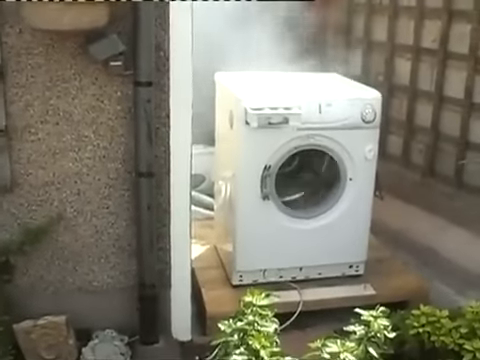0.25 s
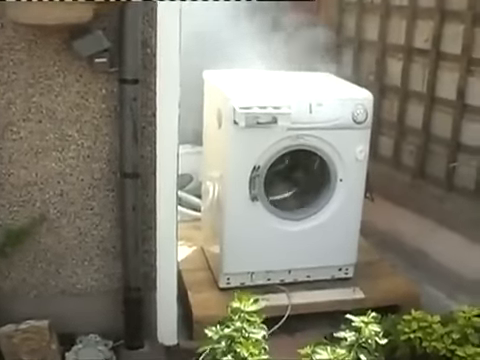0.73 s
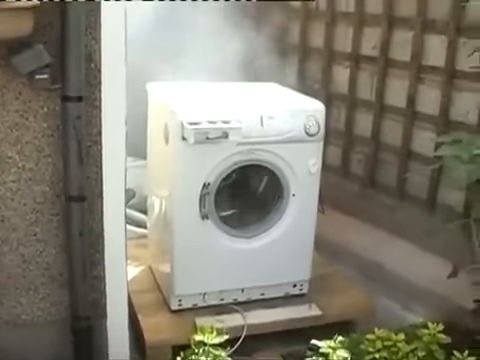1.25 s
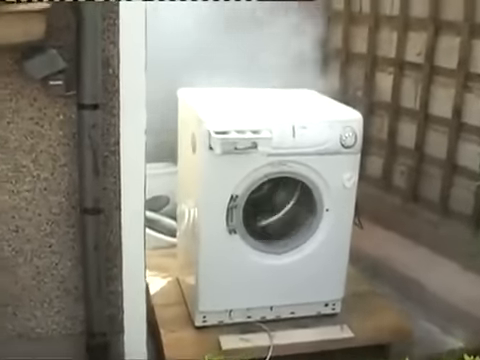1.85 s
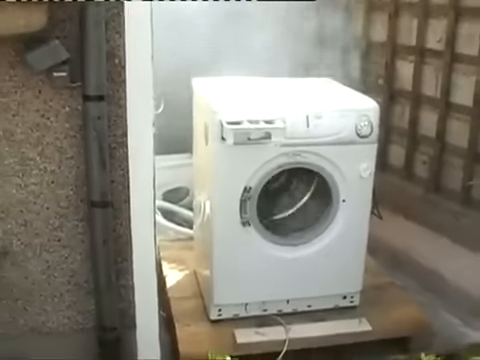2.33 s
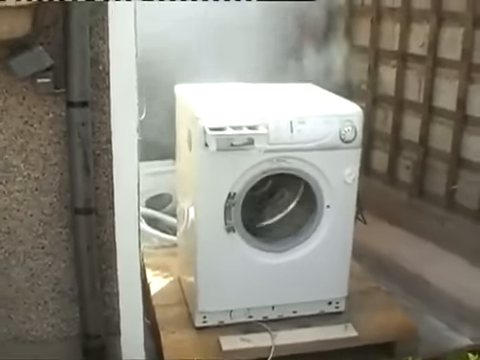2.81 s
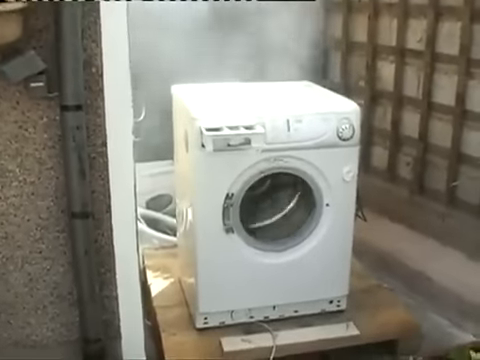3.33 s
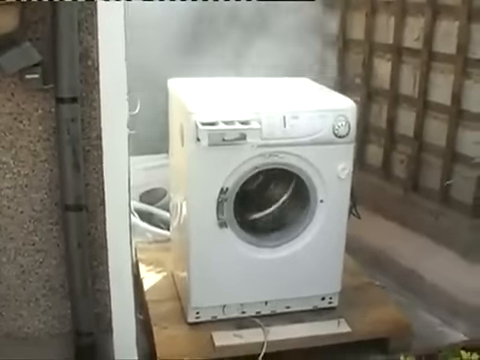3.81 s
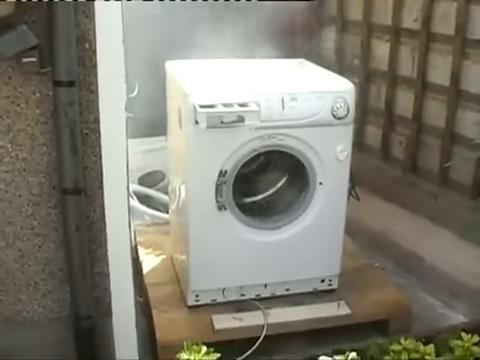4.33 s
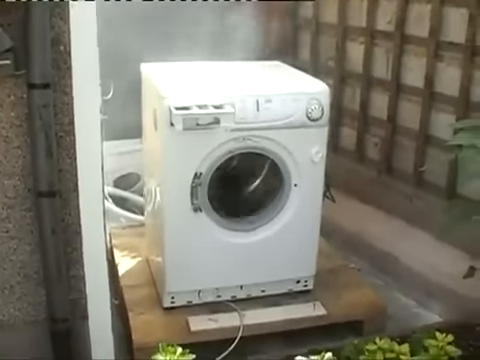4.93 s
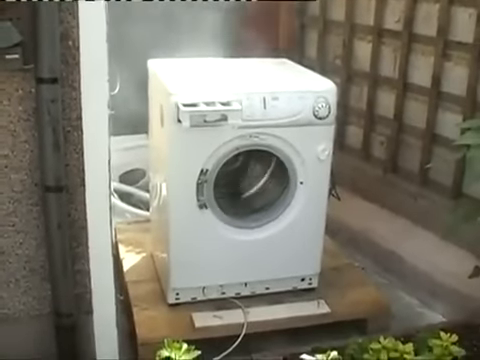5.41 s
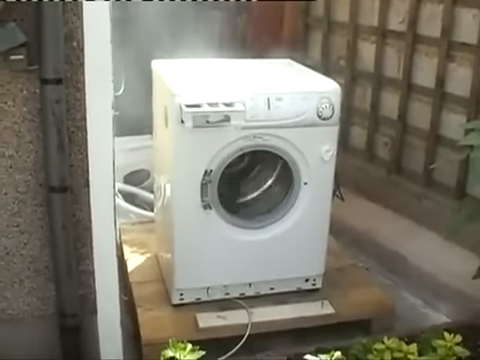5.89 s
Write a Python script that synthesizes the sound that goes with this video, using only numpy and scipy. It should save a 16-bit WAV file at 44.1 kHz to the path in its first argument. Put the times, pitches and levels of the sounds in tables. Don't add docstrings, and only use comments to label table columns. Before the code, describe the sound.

A continuous, violent machine-gun clatter: a rock strikes the same spots in a spinning washer drum on every turn, so the pattern nearly repeats. Blunt thuds shake the casing, the drum shell rings and hums, and bare steel rasps brightly. Close by in a hard-walled yard, the small microphone clips and sags under each burst, with short scattered reflections on both sides and no other sounds.

```python
import sys
import numpy as np
from scipy import signal
from scipy.fft import rfft, irfft, next_fast_len
from scipy.io import wavfile
from scipy.ndimage import map_coordinates

SR = 44100
rng = np.random.default_rng(int(sys.argv[2]) if len(sys.argv) > 2 else 0)


def materialize(psi):
    bounded = np.clip(np.atleast_2d(psi).T, -1, 1)
    quanta = np.round(bounded * 32767).astype(np.int16)
    wavfile.write(sys.argv[1], SR, quanta)


def attenuation_scalar(level_db):
    decades = np.asarray(level_db, float) / 20
    return 10 ** decades


N = 271215

# (time into the turn [s], strength [dB], hardness [-1 blunt to 1 sharp])
CONTACTS = [(.0040, -3.5, -0.82), (.0104, -5, -0.46), (0.0164, -8, 0.36), (0.018, -4.5, 0.27),
            (0.021, -1, -0.12), (0.0234, 4.5, -0.72), (0.0286, 1.5, 0.029), (.0290, 3.5, 1),
            (0.0314, 0.5, 0.11), (0.033, 0, 0.14), (.0353, -4.5, 0.21), (0.0377, 4.5, 0.019),
            (0.0416, 0, -.1), (0.0458, 1.5, -0.63), (0.0469, 0, 0.23), (.0530, -3.5, -.5),
            (.0597, -6, -0.078), (.0626, -12.5, -0.084)]
# (frequency [Hz], width [Hz], level [dB])
CASING_MODES = [(205, 88, -6), (325, 134, -5.5), (656, 284, 0)]
# (frequency [Hz], width [Hz], level [dB])
DRUM_MODES = [(1060, 277, 3.5), (1297, 310, 1), (1820, 380, 0)]
# (frequency [Hz], width [Hz], level
# [dB])
SHELL_MODES = [(672, 60, -7), (1002, 26, -5.5), (1322, 27, -4.5), (1560, 28, -4), (1724, 37, -4.5),
               (2060, 80, -10), (2270, 12, -6.5), (2939, 17, 3.5), (4074, 53, -4.5), (5130, 33, -6),
               (6020, 38, -12.5)]
# (frequency [Hz], width [Hz], level [dB])
THUMP_MODES = [(173, 61, -1.5)]
# (frequency [Hz], width [Hz], level [dB])
TICK_MODES = [(3360, 900, -3.5), (4340, 800, 1.5), (5700, 1200, -1)]
# (frequency [Hz], density [dB per Hz])
GRIND_SPECTRUM = [(35, -31.5), (90, -12.5), (160, -13.5), (330, -7.5), (590, -7.5), (630, -1.5),
                  (780, -4.5), (885, -6.5), (950, -5), (1230, 0.5), (1450, -4.5), (2200, -4), (2400, -9),
                  (2800, -10), (3640, -43), (6160, -120)]
# (frequency [Hz], density [dB per Hz])
STEEL_SPECTRUM = [(1500, -33.5), (2400, -12.5), (3000, -8.5), (4050, -4), (4950, -1), (6020, 1), (7220, -6),
                  (7960, -17), (9000, -13), (10400, -20), (11000, -35)]
# (frequency [Hz], density [dB per Hz])
WALL_SPECTRUM = [(30, -4), (400, -7), (800, -26.5), (3300, -25.5), (5000, -10), (7500, 12), (9300, 8),
                 (10400, -6), (11000, -10)]
# (frequency [Hz], on every turn [0-1], for a few turns [0-1])
REPEAT_SHARES = [(100, 0.11, 0), (597, 0.55, 0.34), (1500, 0.38, 0.41), (3260, 0, 0.72), (6000, 0.28, 0.43),
                 (9100, 0.06, 0)]
# (frequency [Hz], left over right [dB], left lead [rad])
PORT_DIFFERENCE = [(60, 2.5, 0), (400, 0.3, 0.12), (700, 0, 0.019), (3300, -0.5, -0.05), (4500, 0.5, 0.16),
                   (6200, -1.8, 0.2), (7250, -2, 0.25), (8130, -6.5, 1.3), (8660, 1.5, 2),
                   (9580, 11.5, 2.05), (10100, 9.5, 1)]
# (multiple of the turn [1], level [dB], gain with slip [dB per mille])
HUM_ORDERS = [(12, -20, -0.06), (22, -16.5, 0.1), (42, -7.5, 0.08), (46, -10.5, -0.3), (61, -15.5, -0.2),
              (64.07, -16.5, 0.4), (65, -14, .85), (68.9, -15.5, -0.44), (72.2, -16, -.3),
              (82.75, -14, -.4), (87.4, -19, -0.2), (99.9, -12, 0.35), (114.4, -17.5, -0.5),
              (131.4, -15, -0.04)]
# (time [s], slower than the steady spin [per mille])
SPEED_SLIP = [
    (0, .55),
    (.75, .16),
    (1.2, -2.14),
    (2.75, 1.82),
    (3.35, -2.14),
    (4.2, .65),
    (5.6, 7.15),
    (6.15, 8.18),
]

TURNS_HZ, START_TURN, START_LAG_S = 15.3, .55, .00102
STEPS = 2880
TURNS = int(N / SR * TURNS_HZ) + 3
SHAFT_SR = TURNS_HZ * STEPS
FIRST_KNOCK, MAIN_BLOW, RELEASE = 5, 6, 15
DRUM_DB, STEEL_DB, STEEL_GROWS_DB_PER_S = -26.5, -22.5, .15
# time of most pressure [s], swing [dB], breadth
DRUM_PRESS, STEEL_PRESS = (.035, 6.06, 1.5), (.028, 6.64, 2)
MISMATCH_DB = 6.5
DRAG_DB, DRAG_S = 2.5, .016
TOP_HZ = 10400


def unit(x):
    return x / np.sqrt(np.mean(x ** 2) + 1e-20)


def along(points, hz, column=1):
    rows = np.transpose(points)
    return np.interp(np.log(hz + 1), np.log(rows[0] + 1), rows[column])


def curve(rows, column, t):
    rows = np.transpose(rows)
    return np.interp(t, rows[0], rows[column])


def filtered(x, response, sr=SR):
    m = next_fast_len(x.shape[-1] + 8192)
    spectrum = rfft(x, m) * response(np.fft.rfftfreq(m, 1 / sr))
    return irfft(spectrum, m)[..., :x.shape[-1]]


def resonances(modes, f):
    total = 0
    for k, (centre, width, db) in enumerate(modes):
        damping = 1j * f * width
        total = total + (-1) ** k * attenuation_scalar(db) * damping / (centre * centre - f * f + damping)
    return total


def drifting(size, turns_held):
    knots = rng.standard_normal((TURNS + 100, size))
    fade = np.exp(-1 / turns_held)
    return signal.lfilter([np.sqrt(1 - fade ** 2)], [1, -fade], knots, axis=0)[100:]


def in_time(x):
    t = np.arange(N) / SR
    lag_s = START_LAG_S + np.cumsum(curve(SPEED_SLIP, 1, t)) / (1000 * SR)
    step = ((t - lag_s) * TURNS_HZ + START_TURN) * STEPS
    return map_coordinates(x, [step], order=4)


def pressure(load):
    peak_s, swing_db, breadth = load
    away = abs(np.sin(np.pi * (np.arange(STEPS) / SHAFT_SR - peak_s) * TURNS_HZ))
    return np.tile(attenuation_scalar(-swing_db * away ** (2 * breadth)), TURNS)


def surface(spectrum):
    even = irfft(np.exp(2j * np.pi * rng.random(STEPS // 2 + 1)), STEPS)
    lasting = np.tile(unit(even), TURNS)
    wearing = drifting(STEPS, turns_held=8.1).ravel()
    fresh = rng.standard_normal(STEPS * TURNS)

    def response(hz):
        lasts = np.clip(along(REPEAT_SHARES, hz), 0, 1)
        wears = np.clip(along(REPEAT_SHARES, hz, column=2), 0, 1 - lasts)
        shares = np.sqrt(np.abs([lasts, wears, 1 - lasts - wears]))
        return shares * attenuation_scalar(along(spectrum, hz))

    return unit(filtered(np.array([lasting, wearing, fresh]), response, SHAFT_SR).sum(0))


def blows(hardness, wander_db, scatter_db):
    time_s, strength_db, own_hardness = np.transpose(CONTACTS)
    db = strength_db - MISMATCH_DB * (own_hardness - hardness) ** 2
    db = db + wander_db * drifting(len(CONTACTS), turns_held=8)
    db = db + scatter_db * rng.standard_normal(db.shape)
    train = np.zeros((TURNS, STEPS))
    train[:, np.round(time_s * SHAFT_SR).astype(int) % STEPS] = attenuation_scalar(db)
    return train.ravel()


def grinding():
    return unit(pressure(DRUM_PRESS) * surface(GRIND_SPECTRUM))


def hum():
    turn = np.arange(STEPS * TURNS) / STEPS - CONTACTS[FIRST_KNOCK][0] * TURNS_HZ
    whole_turns = np.arange(TURNS)
    slip_per_mille = curve(SPEED_SLIP, 1, whole_turns / TURNS_HZ)
    breath_db = 1.1 * drifting(len(HUM_ORDERS), turns_held=6.8).T
    offsets = 0.21 * rng.standard_normal(len(HUM_ORDERS))
    out = np.zeros(len(turn))
    for (order, db, sag_db), drift_db, offset in zip(HUM_ORDERS, breath_db, offsets):
        level_db = db + sag_db * slip_per_mille + drift_db + 1.5
        gain = np.interp(turn, whole_turns, attenuation_scalar(level_db))
        out += gain * np.cos(2 * np.pi * (round(order) * turn + offset))
    return unit(pressure(DRUM_PRESS) ** 1.47) * out


def knocks():
    soft = lambda hz: resonances(CASING_MODES, hz) / (1 + 1j * hz / 900)
    return unit(filtered(blows(-1.02, wander_db=1.15, scatter_db=1.5), soft, SHAFT_SR))


def clanks():
    sides = np.tile(rng.choice([-1, 1], STEPS), TURNS)
    hits = sides * blows(0, wander_db=1.4, scatter_db=.8)
    return unit(filtered(hits, lambda hz: resonances(DRUM_MODES, hz), SHAFT_SR))


def thump():
    train = np.zeros((TURNS, STEPS))
    landing = round((CONTACTS[MAIN_BLOW][0] - .0009) * SHAFT_SR)
    train[:, landing] = attenuation_scalar(1.4 * rng.standard_normal(TURNS))
    train[:, round(CONTACTS[RELEASE][0] * SHAFT_SR)] = -.45
    jump = lambda hz: -1 / (1 + 1j * hz / 5) / (1 + 1j * hz / 350) * 1j * hz / (4 + 1j * hz)
    response = lambda hz: jump(hz) - attenuation_scalar(-40.0) * resonances(THUMP_MODES, hz)
    return unit(filtered(train.ravel(), response, SHAFT_SR))


def drum():
    struck = attenuation_scalar(-7.5) * knocks() + attenuation_scalar(-6.5) * clanks() + attenuation_scalar(-15.5) * thump()
    return unit(grinding() + attenuation_scalar(-2.5) * hum() + attenuation_scalar(1.0) * struck)


def drag():
    since_s = (np.arange(STEPS) / SHAFT_SR - CONTACTS[MAIN_BLOW + 1][0]) % (1 / TURNS_HZ)
    return np.tile(attenuation_scalar(DRAG_DB * np.exp(-(since_s / DRAG_S) ** 2)), TURNS)


def steel():
    t = np.arange(300) / SHAFT_SR
    flare_shape = attenuation_scalar(-60 * t / .010) * (1 - np.exp(-t / .00015))
    hits = blows(1, wander_db=1, scatter_db=1)
    flare = signal.fftconvolve(hits, flare_shape)[:STEPS * TURNS]
    ticks = unit(filtered(hits, lambda hz: resonances(TICK_MODES, hz), SHAFT_SR))
    force = drag() * pressure(STEEL_PRESS) + attenuation_scalar(-5.0) * flare
    return unit(unit(force * surface(STEEL_SPECTRUM)) - attenuation_scalar(-14.5) * ticks)


def walls():
    scatter = surface(WALL_SPECTRUM)
    gain = attenuation_scalar(-34.5) * pressure(STEEL_PRESS) ** 1.16
    return np.array([in_time(gain * np.roll(scatter, shift)) for shift in (0, STEPS // 3)])


def ports(hz):
    lead = np.exp(.5j * along(PORT_DIFFERENCE, hz, column=2))
    tilt = attenuation_scalar(along(PORT_DIFFERENCE, hz) / 2) * lead
    return np.array([tilt, 1 / tilt])


def scene():
    t = np.arange(N) / SR
    direct = attenuation_scalar(DRUM_DB) * in_time(drum())
    direct = direct + attenuation_scalar(STEEL_DB + STEEL_GROWS_DB_PER_S * t) * in_time(steel())
    shell = lambda hz: attenuation_scalar(0.23) * (1 + abs(resonances(SHELL_MODES, hz)))
    return filtered(direct, lambda hz: shell(hz) * ports(hz)) + filtered(walls(), ports)


def band_limit(x):
    return signal.sosfilt(signal.butter(12, 11350, fs=SR, output="sos"), x)


def record(dry):
    bias = lambda hz: (0.96 / (1 + 1j * hz / 25) + 0.8) * 1j * hz / (4 + 1j * hz)
    sagged = dry - filtered(np.minimum(dry ** 2, .15), bias)
    clipped = sagged / (1 + abs(sagged / .55) ** 4) ** (1 / 4)
    band = lambda hz: 1 / (1 + (hz / TOP_HZ) ** 200) + attenuation_scalar(-34) / (1 + (hz / TOP_HZ) ** 60)
    return band_limit(filtered(clipped, band))


dry = scene()
out = record(dry)
materialize(out)
```